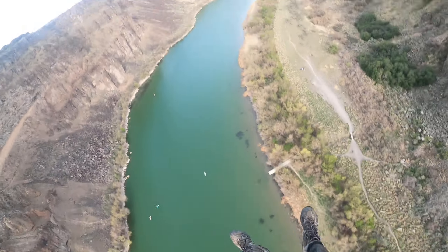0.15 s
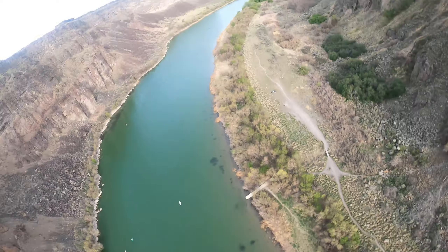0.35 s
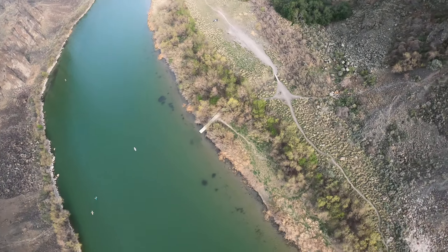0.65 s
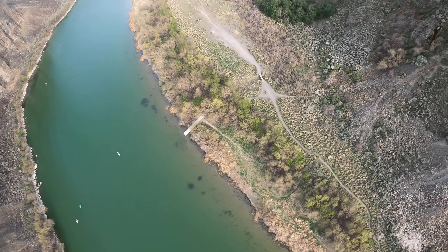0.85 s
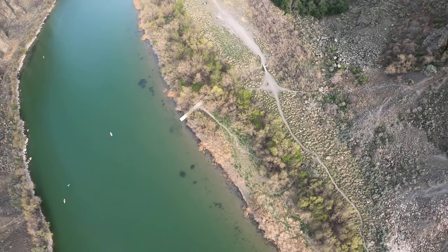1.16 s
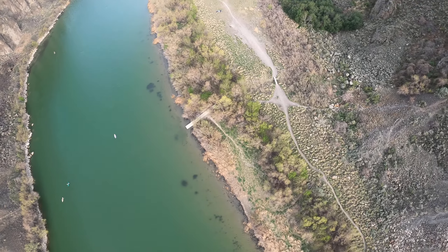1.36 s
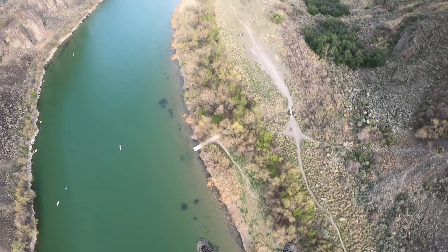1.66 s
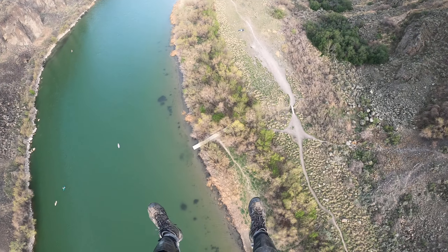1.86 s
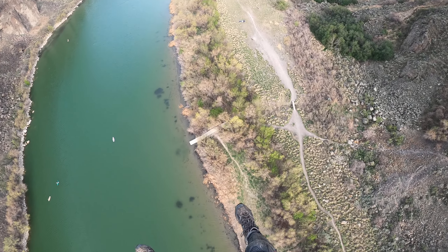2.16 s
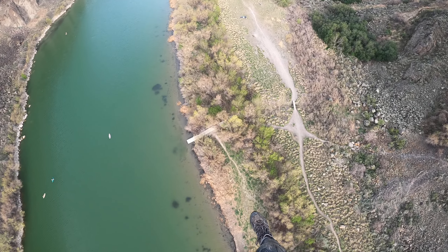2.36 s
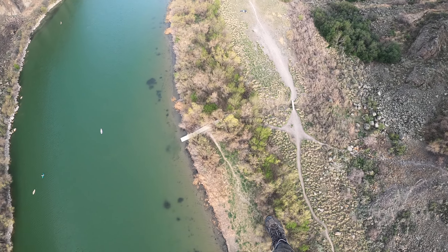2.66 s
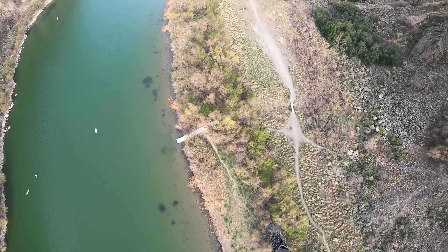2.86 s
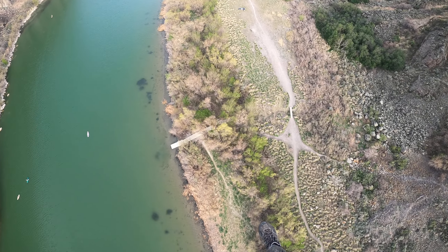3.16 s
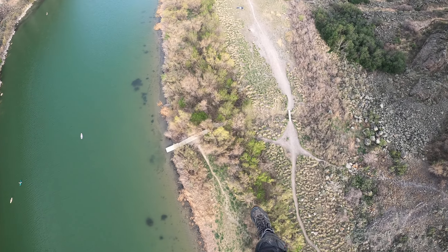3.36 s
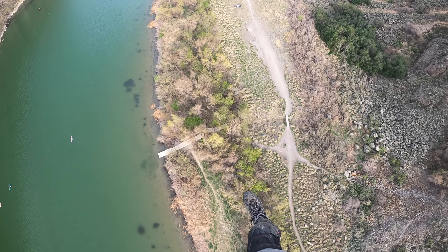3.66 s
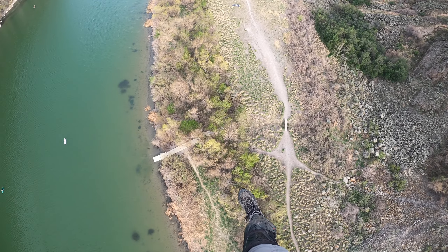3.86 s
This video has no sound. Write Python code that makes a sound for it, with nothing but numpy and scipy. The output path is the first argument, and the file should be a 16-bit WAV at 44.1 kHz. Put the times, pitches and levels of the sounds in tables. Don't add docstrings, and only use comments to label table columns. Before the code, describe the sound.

Wind roars low and muffled against a small closed camera housing, with throbbing buffets, cloth rustle and dense strap knocks until 0.3 s. It breaks off, gives another low gust around 0.5 s, then sinks to a faint hush with tiny ticks and scrapes. Chirps at 1.7 s precede a loud buckle snap with thud at 1.82 s. Wind dips, ticks at 2 s, then builds, brighter, with a thin steady whistle from 2.45 s.

```python
import sys
import numpy as np
from scipy import signal
from scipy.fft import rfft, irfft, next_fast_len
from scipy.io import wavfile
from scipy.ndimage import uniform_filter1d

SR = 44100
rng = np.random.default_rng(int(sys.argv[2]) if len(sys.argv) > 2 else 0)


def int16_out(signal):
    q = np.round(np.clip(np.atleast_2d(signal).T, -1, 1) * 32767)
    wavfile.write(sys.argv[1], SR, q.astype(np.int16))


def gain_from_db(level_db):
    decades = np.asarray(level_db, float) / 20
    return 10 ** decades


N = 176400
SIZE = next_fast_len(N + 8192)
HZ = np.arange(SIZE // 2 + 1) * SR / SIZE
TIME = np.arange(N) / SR
SNAP_S = 1.8186


def on_log(points):
    p = np.array(points, float)
    return np.interp(np.log(HZ + 1), np.log(p[:, 0]), p[:, 1])


def response(broad, modes):
    power = gain_from_db(on_log(broad)) ** 2
    for hz, width, db in modes:
        power = power + gain_from_db(db) ** 2 / (1 + ((HZ - hz) / width) ** 2) ** 2
    cepstrum = irfft(np.log(power) / 2, SIZE)
    cepstrum[1:SIZE // 2] *= 2
    cepstrum[SIZE // 2 + 1:] = 0
    return np.exp(rfft(cepstrum))


def through(x, h):
    lead_in = x[..., SIZE - N - 1::-1]
    return irfft(rfft(np.concatenate([x, lead_in], axis=-1)) * h, SIZE)[..., :N]


def band_rms(h, lo_hz, hi_hz):
    band = (HZ > lo_hz) & (HZ < hi_hz)
    return np.sqrt(np.sum(np.abs(h[band]) ** 2) / len(HZ))


def walk(rate):
    k = int(SR / rate)
    held = np.repeat(rng.standard_normal(N // k + 1), k)
    return 0.94 * uniform_filter1d(uniform_filter1d(held, k), k)[:N]


def housing_responses():
    # (frequency [Hz], level per Hz [dB])
    sum_broad = [(25, -13), (150, -10.5), (320, -21), (800, -31.5), (2700, -43.5), (5900, -62),
                 (9800, -100), (16000, -104)]
    diff_broad = [(25, -30.5), (150, -58.5), (800, -31.5), (1800, -42.5), (2800, -66.5), (4600, -42),
                  (6400, -66.5), (16000, -120)]
    # (frequency [Hz], width [Hz], level [dB])
    sum_modes = [(75.6, 19, -3.5), (525, 73, -24), (1102, 163, -20.5), (1470, 144, -23), (1662, 167, -26.5),
                 (2060, 300, -45.5), (3170, 132, -30.5), (3580, 330, -39), (3910, 94, -43.5),
                 (4150, 45, -33.5), (4460, 130, -44), (4906, 312, -37.5), (5356, 130, -41),
                 (6380, 380, -57)]
    diff_modes = [(65, 40, -42), (255, 45, -21.5), (500, 100, -29), (1400, 170, -31), (2130, 130, -34),
                  (3160, 360, -42.5), (3550, 300, -59.5), (3930, 60, -38), (4190, 90, -32),
                  (4850, 200, -46.5), (5800, 400, -51.5)]
    return response(sum_broad, sum_modes), response(diff_broad, diff_modes)


def cloth_response():
    # (frequency [Hz], level [dB])
    cloth_curve = [(300, -6.5), (1200, -0.5), (2600, -2.5), (3600, -4), (5000, -13.5), (6600, -21.5),
                   (9000, -34.5), (14000, -67)]
    return response(cloth_curve, [])


def eddies(housing):
    # (time [s], level [dB], brightness [dB])
    rush_table = [(0, -30, -9.5), (.15, -26.5, -11), (.27, -36, -9.5), (.32, -44, -7.5), (.45, -38, 0),
                  (.62, -50, 1.5), (.8, -52, -4), (1.3, -56, -7.5), (1.44, -49, 1.5), (1.78, -46, -3),
                  (2.02, -47, -1), (2.12, -45, -1.5), (2.3, -40.5, -3.5), (2.46, -36, -3.5), (2.51, -39, 3),
                  (2.7, -35.5, 4), (3.15, -34, 4.5), (4, -32.5, 0)]
    # (time [s], level [dB], share of smaller eddies [dB])
    buffet_table = [(0, -9.5, -2), (.2, -12, -3), (.295, -11.5, -7), (.315, -22.5, -2), (.39, -17, -2),
                    (.48, -29.5, -5), (.54, -13.5, -8.5), (.58, -35, -12.5), (.72, -40.5, -3),
                    (.95, -30.5, -2.5), (1.35, -36.5, 6.5), (1.47, -29, -1), (1.79, -23.5, 1.5),
                    (2.0, -29.5, 2), (2.17, -28, -3), (2.4, -22, -0.5), (3.0, -19.5, 0), (4, -19, -0.5)]
    rush_s, rush_db, bright_db = np.array(rush_table, float).T
    buffet_s, buffet_db, smaller_db = np.array(buffet_table, float).T
    rush = np.interp(TIME, rush_s, rush_db) - 20 * np.log10(band_rms(housing, 900, 1800))
    bright = np.interp(TIME, rush_s, bright_db)
    buffet = np.interp(TIME, buffet_s, buffet_db) - 20 * np.log10(band_rms(housing, 30, 200))
    smaller = np.interp(TIME, buffet_s, smaller_db)
    shock = 13 * np.interp(TIME, [.12, .25, .3, .315], [0, 1, 1, 0])
    middle = shock + 0.1 * (rush - rush[-1])
    swell, near, throb = walk(4), walk(7.4), walk(13)
    out = 0
    for octave in np.arange(4, 14.5, .5):
        centre_hz = 2 ** octave
        shape = np.cos(np.pi * np.clip(np.log2(HZ + 1) - octave, -.5, .5))
        small = 1 / (1 + (264 / centre_hz) ** 4.04)
        top = 1 / (1 + (2500 / centre_hz) ** 12.0)
        near = .8 * near + .6 * walk(11)
        db = (1 - small) * (buffet + 2 * throb) + small * (rush - 0.84 * swell) + top * bright
        db = db + middle * np.exp(-np.log2(centre_hz / 380) ** 2)
        db = db + smaller * np.exp(-2 * np.log2(centre_hz / 144) ** 2)
        flicker = 1.72 * walk(24.973)
        out = out + gain_from_db(db + 0.5 * near + flicker) * through(rng.standard_normal((2, N)), shape)
    return out


def rustle(cloth):
    # (time [s], level [dB])
    rustle_table = [(0, -70), (.2, -62.5), (.31, -77.5), (.46, -66), (.6, -81.5), (.95, -91), (1.3, -104),
                    (1.45, -90), (1.67, -84), (1.72, -72), (1.8, -76.5)]
    creases_per_s, crease_s, spread_db = 400, .002, 2.2
    strength = gain_from_db(spread_db * np.minimum(rng.exponential(size=N), 5))
    hits = (rng.random(N) < creases_per_s / SR) * strength
    puffs = signal.lfilter([1], [1, -np.exp(-1 / (crease_s * SR))], hits) + 0.39
    puffs = puffs / np.sqrt(np.mean(puffs ** 2))
    level = gain_from_db(np.interp(TIME, *np.array(rustle_table).T) + 2 * walk(7.9)) * (TIME < SNAP_S)
    return rng.standard_normal((2, N)) * puffs * level / band_rms(cloth, 5900, 9000)


def knocks(housing, cloth):
    # (time [s], peak [dB], thump [dB], grit [dB], length [ms])
    jolts = [(0.0478, -21.5, 2, 0.5, 1.2), (0.1282, -15.5, -6, -6, 1.3), (0.1557, -13.5, -13, -5, 2.8),
             (0.1945, -5, -10.5, -17.5, 2.4), (0.2058, -13, 3.5, -12.5, 1.4), (0.2337, -15, 3, -23, 2.1),
             (0.2449, -12, 2, -22.5, 1.4), (0.2567, -16, -4, -16.5, 0.79), (0.2744, -5.5, 5, -36, 2.2),
             (0.2964, -27.5, -4, -9, 2.5), (0.082, -17.5, -7.5, -17, 3), (0.31, -25, -9, -18, 2),
             (0.389, -14, -10.5, -22, 1.7), (0.6688, -44, -6, -5, 2.5), (0.8437, -38, 1, -12, 2),
             (1.25, -44.5, -12, -5, 4.6), (1.2964, -51, -10, -5, 2), (1.44, -41, -4, -3, 4.4),
             (1.5654, -31, -12, -4, 0.96), (1.718, -33, -15, 0, 2.8), (1.7437, -34.5, -14, 2, 2.9),
             (1.9497, -38, -8, -7, 3.9)]
    tick = (2, -21.5, -14, -12, 1.3)
    length = 4096
    layers = np.zeros((3, N + length))
    t = np.arange(length) / SR
    for s, db, thump_db, grit_db, ms in [tick] + jolts:
        u = t / (ms / 1000 * np.array([[1], [2.5], [1]]))
        burst = rng.standard_normal((3, length)) * np.sqrt(2 * u) * np.exp(.5 - u)
        start = int(s * SR)
        layers[:, start:start + length] += burst * gain_from_db(db - 10.0 + np.c_[[0, thump_db, grit_db]])
    body = housing * HZ ** 4 / (HZ ** 4 + 700. ** 4) / (1 + (HZ / 2500.) ** 2)
    thump = (HZ / 350.) / (1 + (HZ / 350.) ** 4.0)
    grit = cloth * HZ ** 2 / (HZ ** 2 + 2200. ** 2) / (1 + (HZ / 8000.) ** 2)
    paths = np.array([h / band_rms(h, 100, 16000) for h in (body, thump, grit)])
    return through(layers[:, :N], paths).sum(axis=0)


def scuffs():
    # (time [s], length [ms], level [dB], airy top [dB])
    scrapes = [(0.197, 1, -51, -12), (.2058, 0.52, -53, -4), (.2255, .6, -47.5, -16),
               (0.2357, 0.48, -47, -12.5), (0.663, 2.3, -60, -21), (.845, 2.5, -61.5, -25),
               (.885, 1, -62, -27), (1.297, 1.1, -62.5, -23.5), (1.395, 1.3, -63, -20.5),
               (1.695, 14, -58, -19.5), (1.72, 6, -51.5, -18), (1.742, 8, -56, -10.5),
               (1.781, 1.8, -54, -15), (1.8201, .35, -31, -13), (.46, 60, -61.5, -28), (.13, 3, -53, -18),
               (.175, 2, -52, -16)]
    noise = rng.standard_normal((2, N))
    band = 1 / (1 + ((HZ - 5200) / 1700) ** 4)
    top = 1 / (1 + ((HZ - 10800) / 2600) ** 4)
    level = 0
    for s, ms, db, top_db in scrapes:
        level = level + np.exp(-((TIME - s) * 1000 / ms) ** 2) * gain_from_db(db + np.c_[[0, top_db]])
    paths = np.array([h / band_rms(h, 0, SR) for h in (band, top)])
    return through(level * noise, paths).sum(axis=0)


def whistle():
    # (start [s], end [s], frequency [Hz], width [Hz], level [dB])
    breaths = [
        (.85, 1.1, 3620, 140, -65),
        (.38, .8, 1300, 50, -50.5),
        (1.704, 1.732, 3200, 200, -42.5),
        (1.737, 1.765, 3150, 200, -48.5),
        (2.45, 3.9, 3165, 45, -53),
        (.85, 1.35, 2600, 220, -67.5),
        (1.08, 1.3, 3250, 150, -68),
    ]
    droop, steady = .015, .45
    out = 0
    for start, end, hz, width, db in breaths:
        u = np.clip((TIME - start) / (end - start), 0, 1)
        flutter = through(rng.standard_normal(N), 1 / (1 + (HZ / width) ** 2))
        tone = np.sin(2 * np.pi * np.cumsum(hz * (1 - droop * u ** 3)) / SR)
        breath = (steady + 0.88 * flutter / flutter.std()) * np.sqrt(2 * np.sin(np.pi * u))
        out = out + gain_from_db(db) * tone * breath
    return out


def snap():
    # (frequency [Hz], level [dB], time to fall 60 dB [s])
    modes = [(363, -22, .05), (806, -14.5, 0.019), (1150, -2, 0.021), (1363, -8.5, 0.034), (1700, 0, 0.029),
             (1873, -38, 0.15), (2170, -7, .024), (2540, -9, .018), (2880, -12.5, 0.02),
             (3210, -22.5, 0.036), (3499, -39, 0.12), (3550, -12, .02), (5060, -24, 0.018)]
    crack_s, rattle_s = .0005, 0.0042
    t = np.maximum(TIME - SNAP_S, 0)
    ring = 0
    for hz, db, t60 in modes:
        ring = ring + gain_from_db(db) * np.sin(2 * np.pi * hz * t) * np.exp(-np.log(1000) * t / t60)
    colour = response([(200, -17), (1000, -1.5), (2700, 4.5), (4000, -4.5), (6000, -24.0),
                       (10000, -38.0), (16000, -42)], [])
    crack = through(rng.standard_normal(N) * (t / crack_s) ** 2 * np.exp(-t / crack_s), colour)
    crack = 2 * crack / np.abs(crack).max()
    dull = colour / (1 + (HZ / 5700.0) ** 4)
    rattle = through(rng.standard_normal(N) * (t > 0) * np.exp(-t / rattle_s), dull)
    ring = ring + gain_from_db(-7.5) * rattle / band_rms(dull, 100, 9000)
    early = np.maximum(TIME - SNAP_S + .003, 0)
    thud = np.sin(2 * np.pi * 74.9 * early) * np.exp(-np.log(1000) * early / 0.37)
    thud = gain_from_db(-10.5) * thud * (1 - np.exp(-early / 0.0049))
    return thud + gain_from_db(-7) * (ring * np.minimum(t / 0.0011, 1) + gain_from_db(-1) * crack)


def gain_control():
    since = TIME - SNAP_S
    fall = (since > 0) * np.minimum(since / 0.0028, 1)
    return gain_from_db(-13 * fall * np.exp(-np.maximum(since - 0.067, 0) / 0.074))


def scene():
    # (frequency [Hz], level [dB])
    left_db = [(60, .8), (300, 2), (600, .3), (1200, 2.4), (2500, 3.5), (4200, -1), (8000, 4)]
    total, diff = housing_responses()
    cloth = cloth_response()
    port_top = 1 / (1 + (HZ / 12900) ** 30)
    air = through(eddies(total) * gain_control(), port_top)
    crease = through(rustle(cloth), cloth)
    solid = knocks(total, cloth) + scuffs() + snap()
    mid = through(air[0], total) + solid + crease[0] + whistle()
    shared = .6
    same = through(air[0], -1j * total * np.abs(diff / total))
    side = shared * same + np.sqrt(1 - shared ** 2) * through(air[1], diff) + .3 * crease[1]
    side = side + through(solid, -.2j * HZ / (HZ + 400.))
    left_late_s = 1e-5
    lean = gain_from_db(on_log(left_db) / 2) * np.exp(-1j * np.pi * HZ * left_late_s)
    return np.array([through(mid, lean) + side, through(mid, 1 / lean) - side])


def band_limit(x):
    return signal.sosfilt(signal.butter(12, 15700, fs=SR, output="sos"), x)


def record(dry):
    mix = np.tanh(.8 * dry) / .8
    return band_limit(mix)


dry = scene()
out = record(dry)
int16_out(out)
```